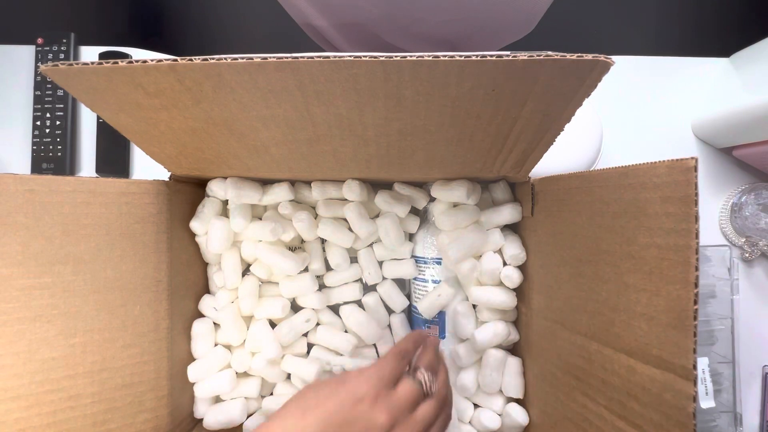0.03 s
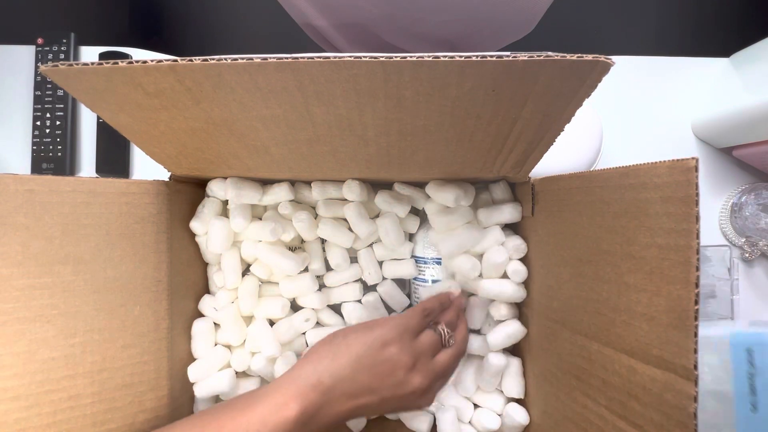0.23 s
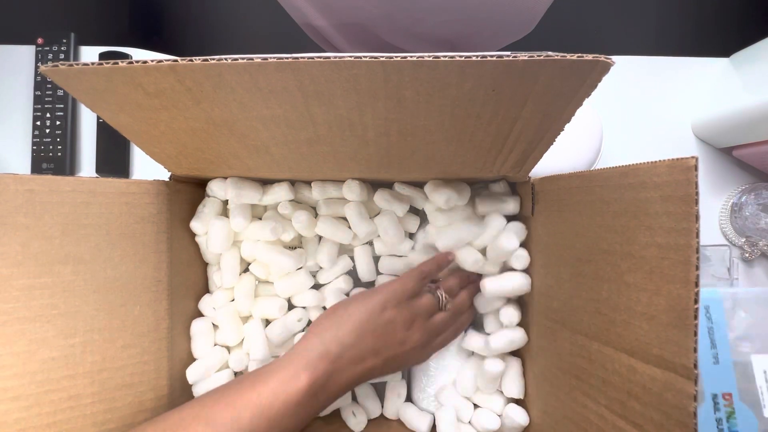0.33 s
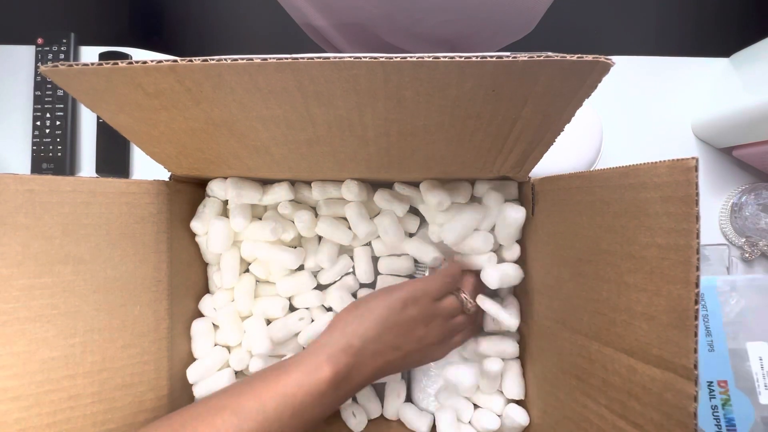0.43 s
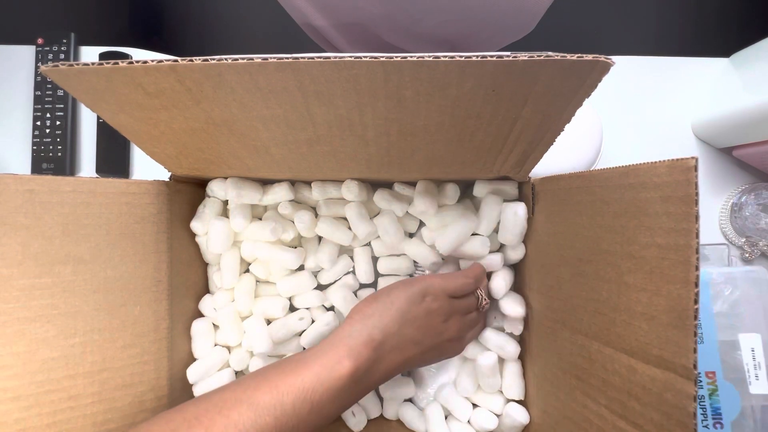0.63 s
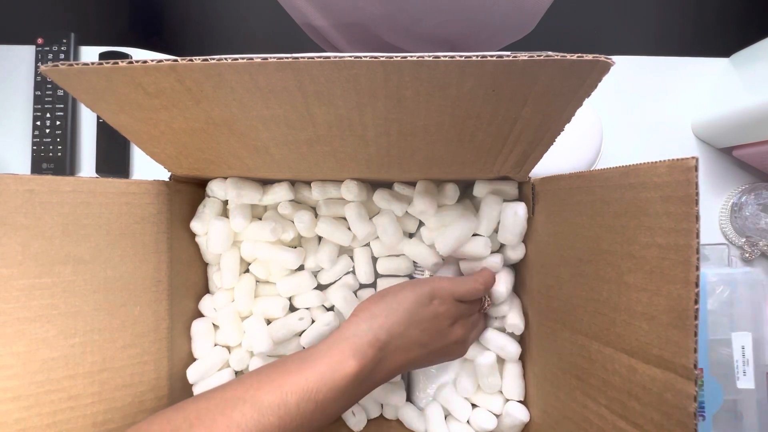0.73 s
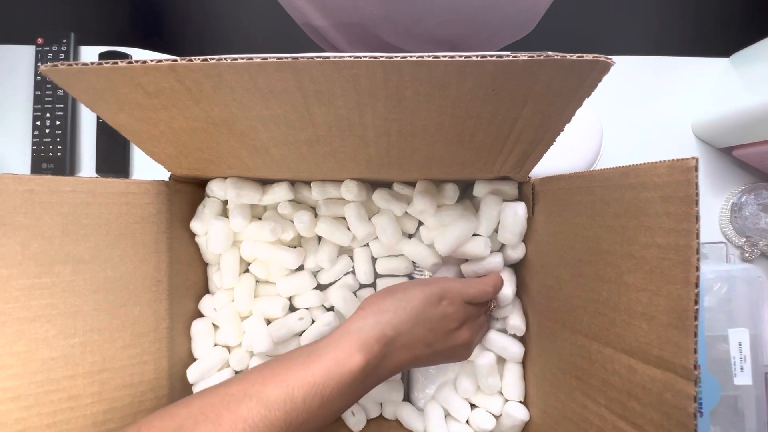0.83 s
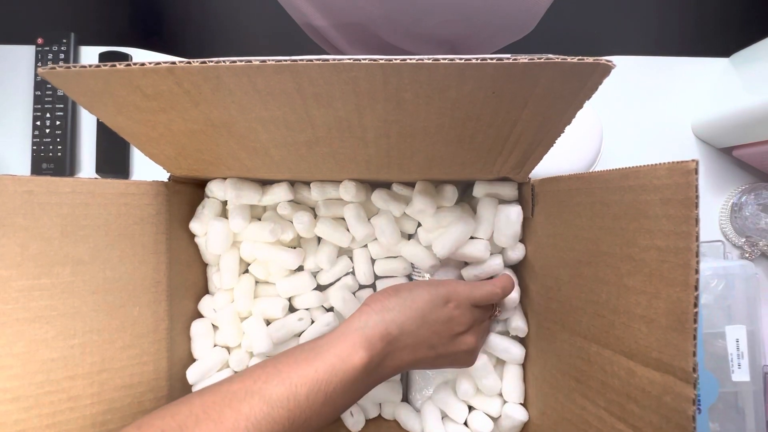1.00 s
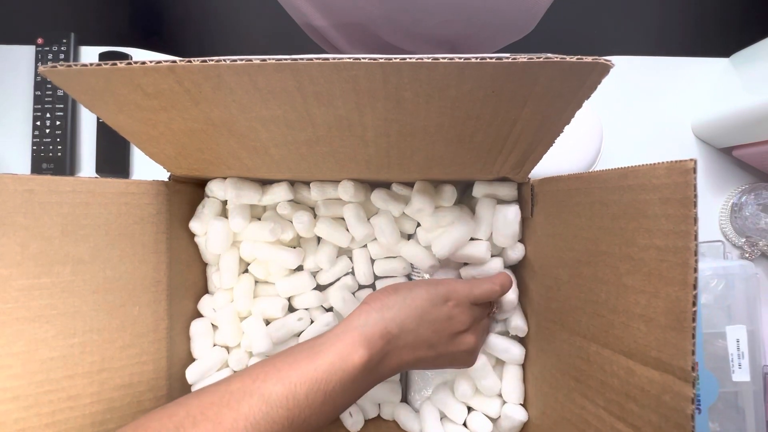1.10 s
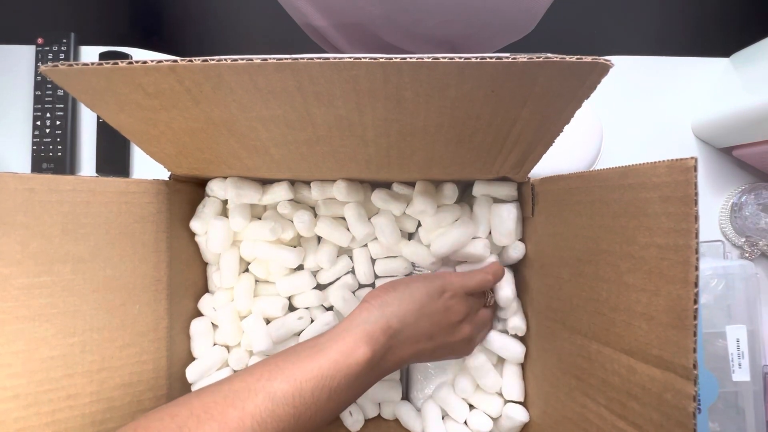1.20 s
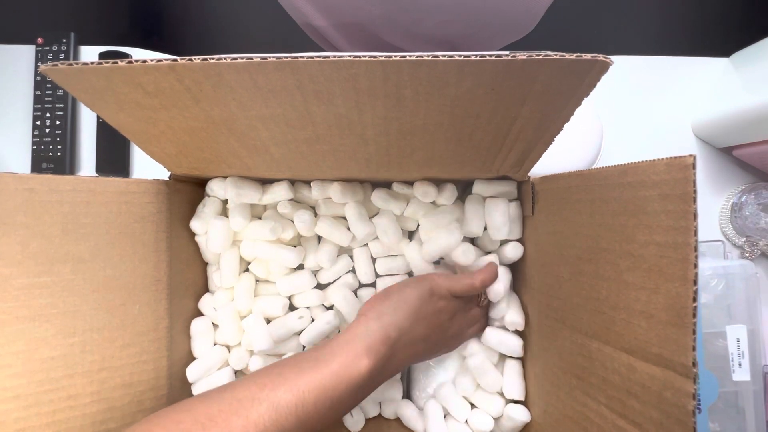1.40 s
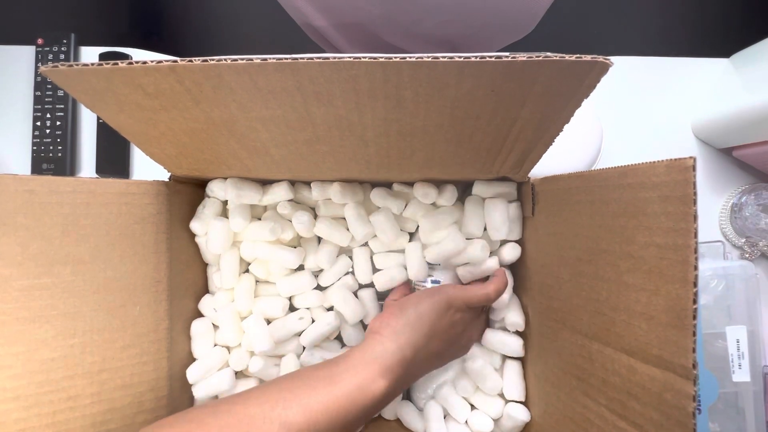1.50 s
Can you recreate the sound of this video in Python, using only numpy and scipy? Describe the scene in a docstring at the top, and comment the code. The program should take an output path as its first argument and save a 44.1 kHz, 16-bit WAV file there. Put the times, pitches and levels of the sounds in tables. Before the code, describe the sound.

Foam packing peanuts rustle and crackle in a cardboard box, with one sharp knock.

```python
"""Digging through packing peanuts

A hand digs through foam peanuts in an open cardboard box on a desk, close to the microphone.
Foam and a plastic bag rub and crackle; a buried item knocks on the box, once hard and often softly.
The box booms a little and a small room answers. It all happens to the right of the microphone."""
import sys
import numpy as np
from scipy import signal
from scipy.fft import rfft, irfft, next_fast_len
from scipy.io import wavfile

SR = 44100
rng = np.random.default_rng(int(sys.argv[2]) if len(sys.argv) > 2 else 0)


def to_wav(s):
    """Save 16-bit WAV."""
    ch = np.atleast_2d(s).T  # columns
    pcm = np.round(np.clip(ch, -1, 1) * 32767)  # PCM
    wavfile.write(sys.argv[1], SR, pcm.astype(np.int16))


N = 68355
T = np.arange(N) / SR


def from_db(db):
    """Turn decibels into a gain."""
    return 10 ** (np.asarray(db) / 20)


def rms_one(x):
    """Scale a sound to an average (rms) level of 1."""
    return x / np.sqrt(np.mean(x ** 2) + 1e-20)


def level(rows):
    """Gain over time from rows of time_s, level_db."""
    return from_db(np.interp(T, *np.transpose(rows)))


def colour(x, points):
    """Shape the tone with a smooth curve through rows of pitch_hz, gain_db."""
    hz, db = np.transpose(points)
    size = next_fast_len(2 * N)
    bin_hz = np.maximum(np.fft.rfftfreq(size, 1 / SR), 1)
    gain = from_db(np.interp(np.log(bin_hz), np.log(hz), db))
    return irfft(rfft(x, size) * gain, size)[..., :N]


def cut(x, hz, kind, order=2):
    """Keep the "low" or the "high" side of a frequency."""
    sections = signal.butter(order, min(hz, SR / 2 - 100), kind, fs=SR, output="sos")
    return signal.sosfilt(sections, x + 1e-18)


def ring(x, hz, ring_s):
    """Each click starts a tone that fades by 60 dB in ring_s."""
    decay = np.exp(-np.log(1000) / (ring_s * SR))
    angle = 2 * np.pi * hz / SR
    return signal.lfilter([0, np.sin(angle)], [1, -2 * decay * np.cos(angle), decay ** 2], x + 1e-18)


def click(time_s):
    """A single click of height 1."""
    return 1. * (np.arange(N) == int(time_s * SR))


def from_right(x, left_db=0):
    """Sound reaches the right side of the microphone first and bends round to the left."""
    lag_s, phase_turn_hz = 0.00016, 724
    turn = np.tan(np.pi * phase_turn_hz / SR)
    bend = (turn - 1) / (turn + 1)
    bent = signal.lfilter([bend, 1], [1, bend], x)  # delays low notes more than high ones
    left = np.interp(T - lag_s, T, bent)
    return np.array([from_db(left_db) * left, x])


def room(x):
    """A small room adds a short wash of echoes, with the same bass on both sides."""
    # tone of the echoes: pitch_hz, gain_db
    echo_tone = [(60, -11), (160, 1), (240, -3), (320, -6), (420, -4.5), (560, -14), (750, -7.5),
                 (1000, 1.5), (1600, -4), (3000, 2.5), (6000, -0.5), (14000, -6)]
    ring_s, build_s, shared_below_hz = 0.21, 0.00091, 290
    treble = cut(rng.standard_normal((2, N)), shared_below_hz, "high")
    bass = cut(rng.standard_normal(N), shared_below_hz, "low")
    decay = np.exp(-np.log(1000) * T / ring_s)
    build = 1 - np.exp(-T / build_s)
    tail = colour(treble + bass, echo_tone) * decay / np.linalg.norm(decay) * build
    return signal.fftconvolve(x[None], tail, axes=1)[:, :N]


def air():
    """The room has a quiet, steady hiss."""
    # tone of the hiss: pitch_hz, gain_db
    hiss_tone = [(25, -17), (100, -19), (300, -24), (1000, -12), (16000, -36)]
    noise = from_right(rng.standard_normal(N)) + .5 * rng.standard_normal((2, N))
    return from_db(-62.5) * rms_one(colour(noise, hiss_tone))


def boom():
    """The whole box flexes on the desk with a deep, soft rumble, the same on both sides."""
    # loudness of the rumble: time_s, level_db
    rumble_levels = [(0, -65), (.11, -60), (.18, -46), (.21, -54), (.3, -40.5), (.37, -38), (.44, -44),
                     (.48, -56), (.55, -56), (.69, -62), (.75, -53), (.85, -53), (1.25, -51), (1.32, -46),
                     (1.365, -41.5), (1.405, -53.5), (1.55, -49.5)]
    # tone of the rumble: pitch_hz, gain_db
    rumble_tone = [(20, 0), (42, -59), (56, -16), (67, 3), (82, -10.5), (110, -5), (160, -23.5), (400, -48)]
    return level(rumble_levels) * rms_one(colour(rng.standard_normal(N), rumble_tone))


def tiny_slips(per_s, spread_db, ring_cycles, blur_gain, low_hz, high_hz, pieces=18):
    """Random tiny slips each ring one of many pieces, over the blur of their echoes."""
    sizes = from_db(spread_db * np.minimum(rng.exponential(1, N), np.pi))
    kicks = sizes * rng.choice([-1, 1], N) * (rng.random(N) < per_s / SR)
    piece_hit = rng.integers(0, pieces, N)
    slips = sum(ring(kicks * (piece_hit == piece), hz, ring_cycles / hz) * hz
                for piece, hz in enumerate(np.geomspace(low_hz, high_hz, pieces)))
    blur = cut(rng.standard_normal((2, N)), high_hz, "low")
    return from_right(rms_one(slips)) + blur_gain * rms_one(blur)


def shifting():
    """The heap jostles and scuffs the cardboard with a hollow rustle."""
    # loudness of the scuffing: time_s, level_db
    scuff_levels = [(0, -55), (.11, -46.5), (.18, -52.5), (.29, -41), (.42, -32.5), (.5, -42.5), (.59, -46),
                    (.67, -46.5), (.72, -39), (.76, -34.5), (.81, -41), (.85, -41), (.9, -50),
                    (1.03, -42.5), (1.065, -48), (1.13, -54), (1.175, -45.5), (1.235, -42.5), (1.33, -45.5),
                    (1.42, -51), (1.47, -49), (1.52, -53), (1.55, -67)]
    # tone of the scuffing: pitch_hz, gain_db
    scuff_tone = [(60, -18), (150, -16), (300, -3), (550, -4), (900, -2.5), (1700, -4), (2700, -26),
                  (5000, -2), (10000, -54)]
    slips = tiny_slips(per_s=900, spread_db=4.5, ring_cycles=9.4, blur_gain=1.41,
                       low_hz=208, high_hz=3580)
    return level(scuff_levels) * rms_one(colour(slips, scuff_tone))


def rubbing():
    """Foam slides on foam and plastic with a fine, bright rustle."""
    # loudness of the rubbing: time_s, level_db
    rub_levels = [(0, -45.5), (.05, -43.5), (.14, -40.5), (.19, -43), (.25, -37.5), (.32, -37),
                  (.35, -29.5), (.44, -41), (.54, -39), (.59, -45.5), (.68, -39), (.75, -33), (.82, -42.5),
                  (.91, -39), (1.02, -41.5), (1.07, -48.5), (1.125, -53.5), (1.17, -45), (1.23, -39.5),
                  (1.285, -41), (1.32, -48.5), (1.36, -49.5), (1.44, -50.5), (1.51, -46.5), (1.55, -47.5)]
    # tone of the rubbing: pitch_hz, gain_db
    rub_tone = [(800, -11.5), (2000, -9.5), (3200, -8), (4500, -6.5), (5800, -1.5), (8000, -6),
                (10000, -24.5), (12500, -12.5), (16000, -27.5)]
    slips = tiny_slips(per_s=2800, spread_db=5.5, ring_cycles=7.9, blur_gain=0.9,
                       low_hz=1800, high_hz=14800)
    return level(rub_levels) * rms_one(colour(slips, rub_tone))


def snaps():
    """A piece slips free: a click amid smaller ones makes a dry crack, a dull tick and a crisp edge."""
    # snaps of foam and plastic: time_s, level_db, pitch_hz, extra_edge_db, crumble_s
    snap_events = [(0.0228, -25, 6350, -6, 0.0006), (0.0379, -27.5, 5600, 1, .0015),
                   (0.061, -23, 6440, 9.5, 0.00054), (.087, -21, 7160, 0, 0.0015),
                   (0.135, -26, 5570, -2, .001), (0.1507, -20.5, 5600, -3, 0.00098),
                   (0.2022, -19.5, 4970, 15.5, 0.0014), (.3345, -9, 4420, -3.5, 0.0014),
                   (0.4128, -26.5, 5000, 14.5, 0.002), (0.4642, -21.5, 6800, 6, 0.0017),
                   (0.4832, -21.5, 5860, 7, 0.0027), (0.5303, -20.5, 5700, 6, 0.00091),
                   (0.534, -25, 6000, -4, .002), (0.5688, -29, 6700, 2, 0.0019),
                   (0.6179, -24, 4830, 10, 0.00087), (0.632, -32, 4600, -6, 0.0013),
                   (0.7028, -19.5, 4570, 6, 0.0029), (0.7084, -22, 5650, -18, 0.0022),
                   (.7311, -21, 6160, -1, 0.0027), (0.7525, -35, 5200, -5, .001),
                   (.7667, -16.5, 5270, -1, 0.00037), (.851, -17.5, 3960, 9.5, 0.00042),
                   (.895, -16.5, 5270, 1, .0005), (0.9083, -28, 2700, 2, 0.00065),
                   (0.9366, -28, 5000, -4, 0.00098), (.96, -24.5, 5800, 15, 0.0017),
                   (0.9969, -24.5, 7000, 1, 0.00098), (1.0253, -35, 3280, -29, 0.00071),
                   (1.0767, -31.5, 8250, 2, 0.00036), (1.1819, -38, 6000, 16, 0.0026),
                   (1.4529, -30.5, 4700, -3, 0.0014), (1.4757, -25, 8900, 12, 0.0011),
                   (1.4987, -29.5, 6000, 14.5, 0.0015)]
    crack_cycles, crumble_gain = 6.9, 0.59
    crackle = np.zeros(N)
    for time_s, level_db, pitch_hz, extra_edge_db, crumble_s in snap_events:
        fade_s = crumble_s * np.where(T > time_s, 1, 0.65)  # swells faster than it fades
        crumble = crumble_gain * rng.standard_normal(N) * np.exp(-np.abs(T - time_s) / fade_s)
        force = click(time_s) + crumble
        crack = ring(np.diff(force, prepend=0), pitch_hz, crack_cycles / pitch_hz)
        tick = ring(force, hz=1800, ring_s=0.0018)
        edge = cut(force, 5740, "high")
        for part, part_db in (crack, 17), (tick, 10), (edge, 7 + extra_edge_db):
            crackle += from_db(level_db + part_db) * part / np.linalg.norm(part)
    crackle = cut(crackle, 1300, "high")
    crackle = cut(crackle, 13600, "low", order=1)
    return from_right(crackle) + from_db(-7) * room(crackle)


def chatter():
    """After the hard knock the heap taps the wall at random for a moment, then settles."""
    start_s, hold_s, fade_s, taps_per_s = .340, 0.034, 0.036, 2500
    age_s = T - start_s
    strength = (age_s > 0) * np.exp(-np.maximum(age_s - hold_s, 0) / fade_s)
    taps = rng.standard_normal(N) * (rng.random(N) < taps_per_s / SR)
    return from_db(-33) * cut(taps * strength, 2500, "low", order=1)


def spot_pop(start_s, pitch_hz):
    """The struck spot flexes for a few cycles, swelling until the foam damps it."""
    swell_cycles, damping = 1.4, 2.64
    cycles = np.maximum(T - start_s, 0) * pitch_hz
    swell = cycles / swell_cycles
    return (swell * np.exp(1 - swell)) ** damping * np.sin(2 * np.pi * cycles)


def knocks():
    """The item hits the cardboard and bounces at once; the struck spot, wall, box and room ring."""
    # hits on the box: start_s, level_db, brightness_hz, spot_pitch_hz, spot_extra_db
    hits = [(0.0954, -39, 623, 440, 2), (.127, -39.5, 490, 398, 5), (.2285, -29, 305, 253, -15),
            (.3330, -9.5, 2640, 792, 3.5), (0.3342, -20.5, 1500, 426, 10), (0.363, -28, 1500, 830, 13),
            (0.3753, -38, 3500, 1480, 4), (0.4126, -25, 2010, 710, 5), (0.7398, -25.5, 2500, 448, 9),
            (.757, -31.5, 600, 165, -2.5), (0.8262, -37, 4000, 1800, 10.5), (0.8813, -41.5, 1450, 920, 13),
            (0.9092, -36, 5000, 1490, 10.5), (1.0562, -45, 5030, 2280, 14.5), (1.0946, -35.5, 4550, 954, 2),
            (1.156, -42.5, 3050, 600, 6), (1.1847, -30.5, 4950, 1280, -7), (1.3353, -43, 1970, 1270, 0),
            (1.4555, -37, 3120, 1350, -13), (1.4918, -32.5, 2400, 1360, -2), (1.4975, -33, 2410, 336, 1)]
    # short ring of the cardboard wall: pitch_hz, gain_db, ring_s
    wall_notes = [(232, -36, 0.025), (400, -18.5, 0.011), (776, -4, 0.0055), (990, 2, 0.0086),
                  (1500, 1, 0.01), (1930, 0, 0.0041), (2700, -1.5, 0.002), (4600, -14, 0.0023)]
    # longer ring of the box and its air: pitch_hz, gain_db, ring_s
    box_notes = [(162, -33, 0.11), (196.4, -24, 0.27), (248, -25, 0.12), (415.7, -28, 0.47),
                 (707, -24.5, 0.4), (785, -23, 0.17), (871, -21, 0.25), (917, -23, 0.22), (1007, -10, 0.24),
                 (1110, -21, 0.18), (1380, -39, 0.19), (1542, -23, 0.2)]
    bounce_s, bounce_db = 0.002582, -6
    force, spot = chatter(), 0
    for start_s, level_db, brightness_hz, spot_pitch_hz, spot_extra_db in hits:
        contact = click(start_s) + from_db(bounce_db) * click(start_s + bounce_s)
        force += from_db(level_db) * cut(contact, brightness_hz, "low", order=1)
        spot += from_db(level_db + spot_extra_db) * spot_pop(start_s, spot_pitch_hz)
    force = cut(force, 240, "high")
    wall = sum(from_db(db) * ring(force, hz, ring_s) for hz, db, ring_s in wall_notes)
    cardboard = spot + from_db(3) * wall
    # neighbouring notes start in opposite directions
    box = sum((-1) ** k * from_db(db) * ring(force, hz, ring_s)
              for k, (hz, db, ring_s) in enumerate(box_notes))
    return from_right(cardboard, left_db=-8) + from_right(box) + from_db(-2) * room(cardboard)


def scene():
    """Add up all the sounds; the left side faces away from the box and is mostly duller."""
    # shading of the microphone's left side: pitch_hz, gain_db
    left_shade = [(60, -4), (250, -0.5), (700, -2), (1700, -5), (2700, 1.5), (4000, -15), (5600, -18.5),
                  (8000, -6.5), (12000, 2.5)]
    left, right = rubbing() + shifting() + snaps() + knocks() + boom() + air()
    return np.array([colour(left, left_shade), right])


def record(dry):
    """Round off the loudest peaks, then remove the lowest bass and the highest treble."""
    peak_limit, bottom_hz, top_hz = .95, 42, 16100
    rounded = peak_limit * np.tanh(dry / peak_limit)
    treble_cut = signal.ellip(10, .2, 90, top_hz, fs=SR, output="sos")
    return signal.sosfilt(treble_cut, cut(rounded, bottom_hz, "high"))


dry = scene()
out = record(dry)
to_wav(out)
```